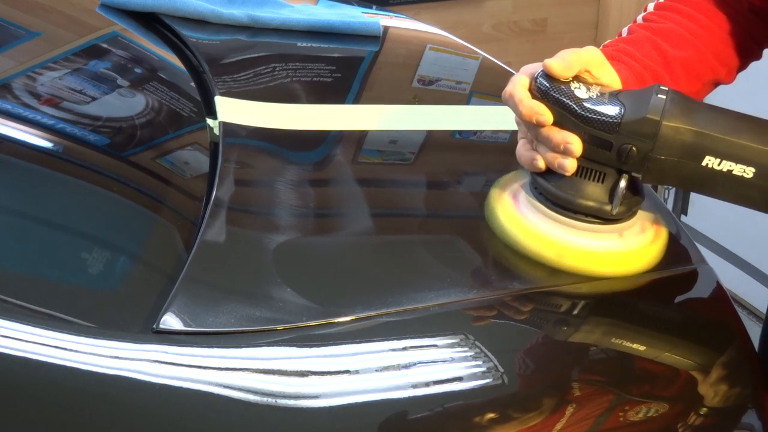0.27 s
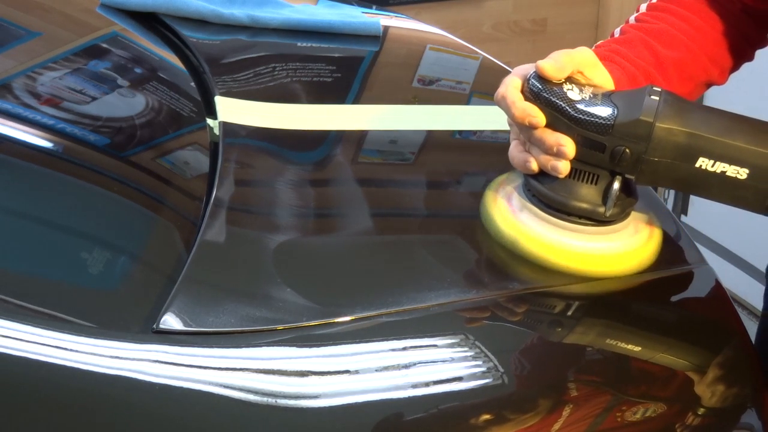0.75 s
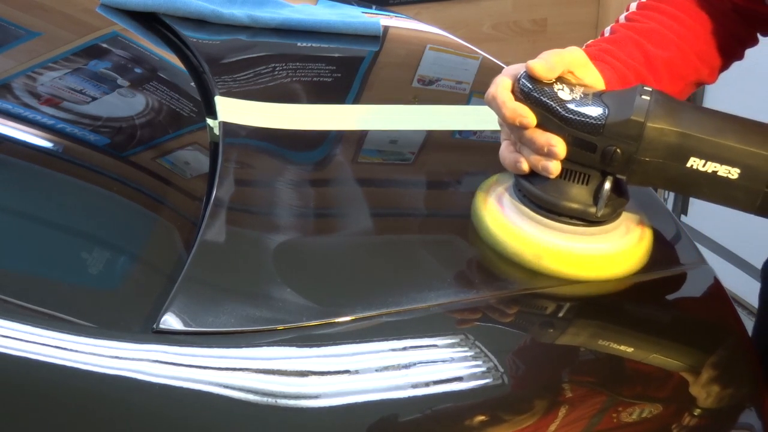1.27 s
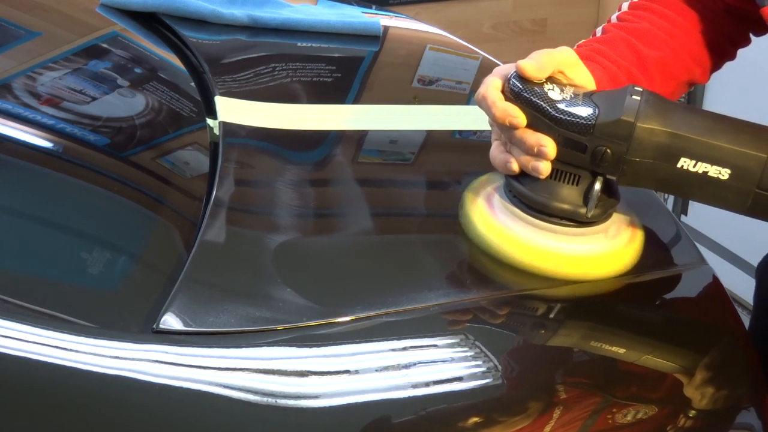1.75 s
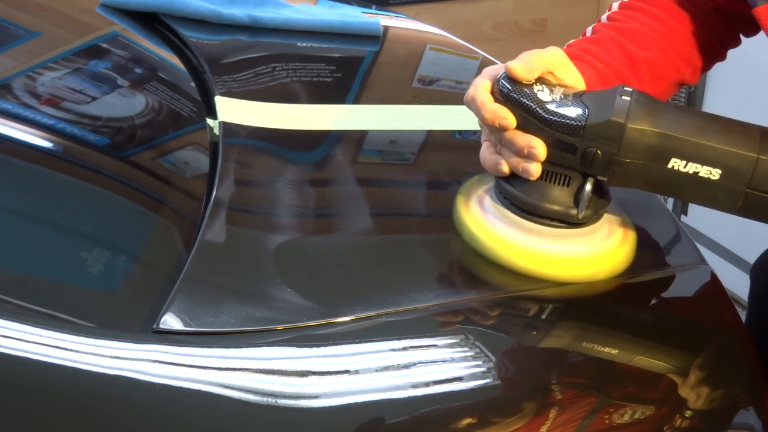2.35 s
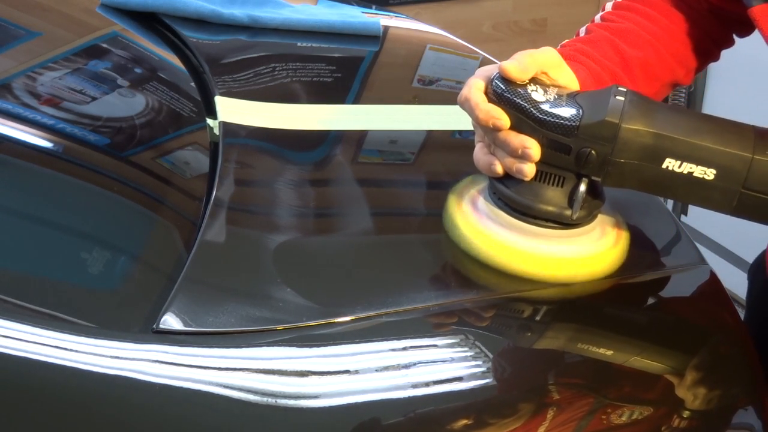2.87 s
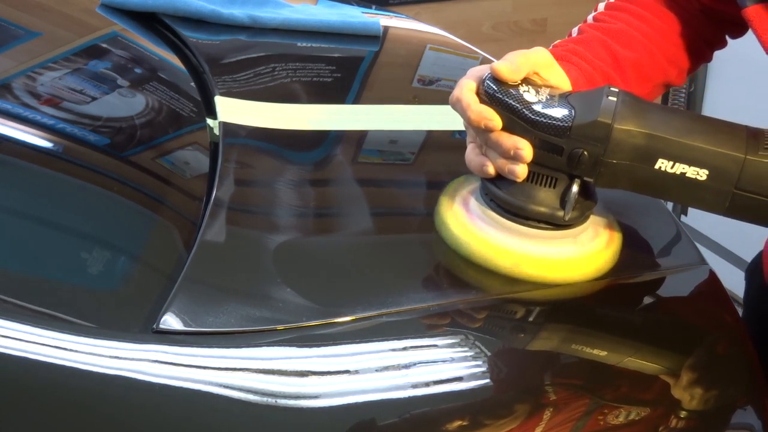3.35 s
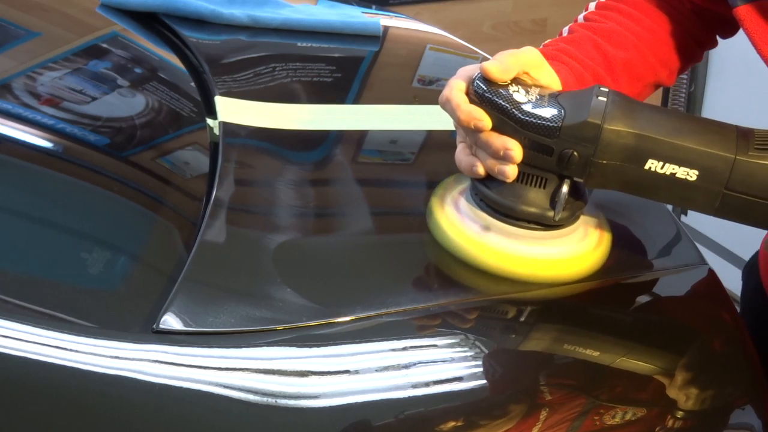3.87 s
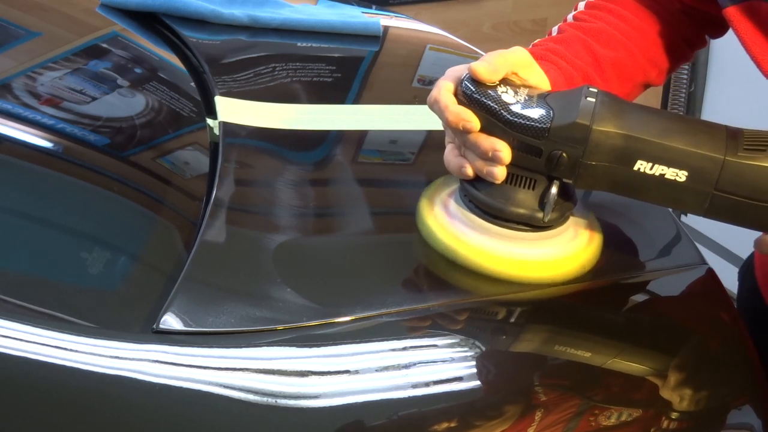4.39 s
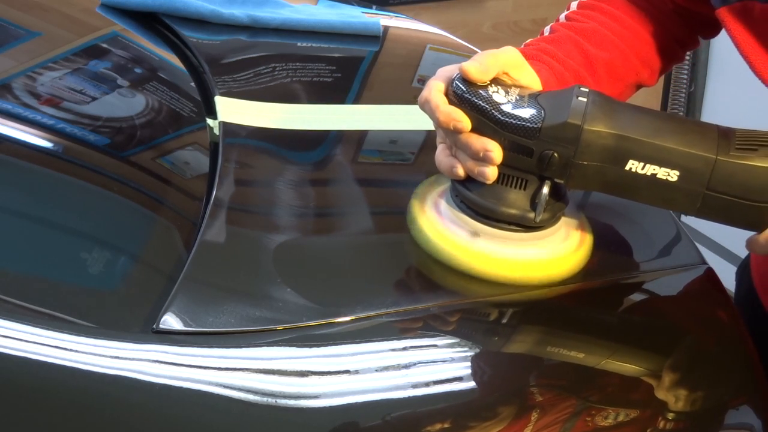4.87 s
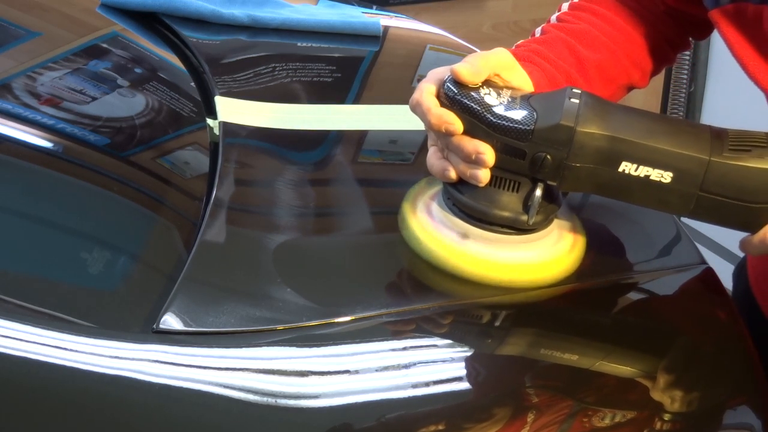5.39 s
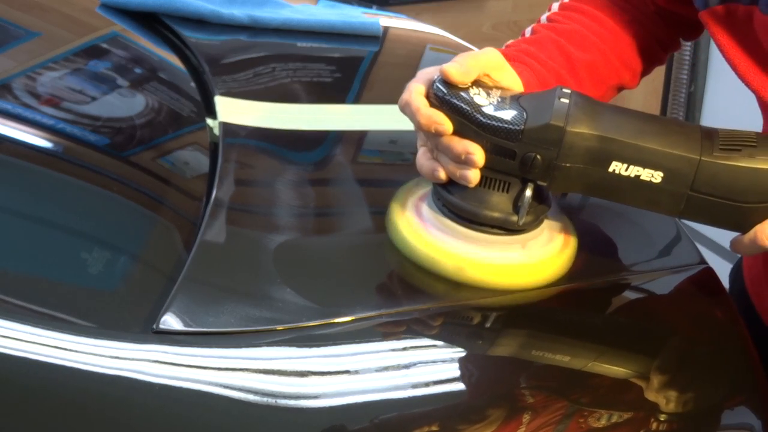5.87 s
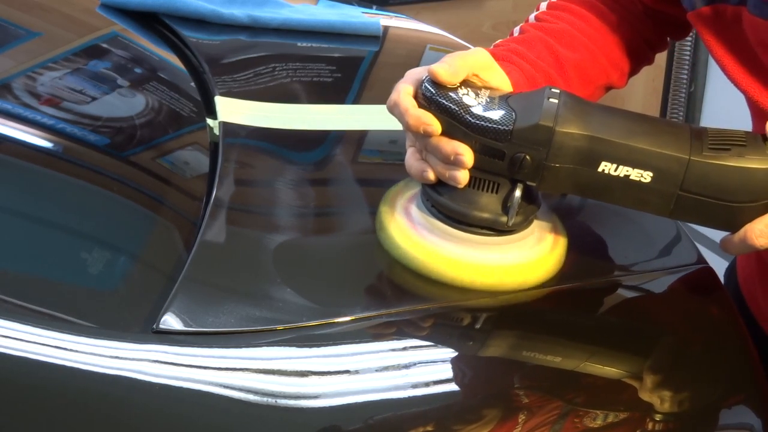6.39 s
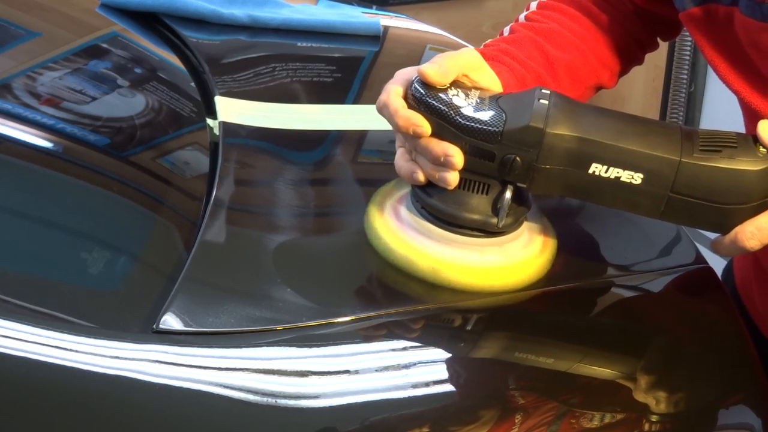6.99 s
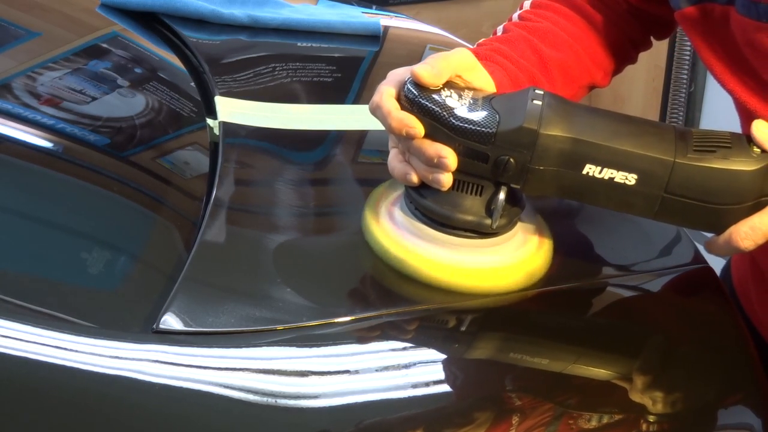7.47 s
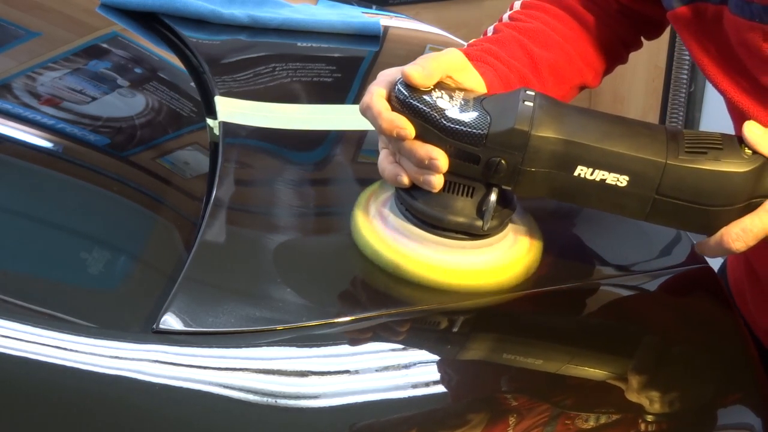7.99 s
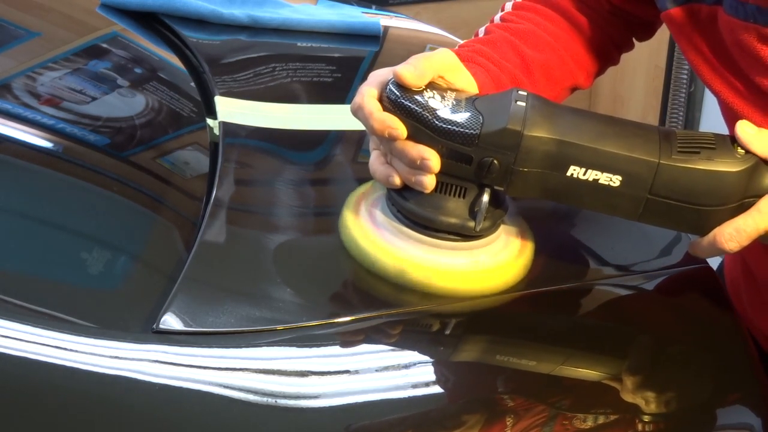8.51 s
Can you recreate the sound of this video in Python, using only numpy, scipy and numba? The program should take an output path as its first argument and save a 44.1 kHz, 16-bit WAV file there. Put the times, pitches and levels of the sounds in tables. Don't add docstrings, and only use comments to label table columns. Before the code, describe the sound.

A power polisher drones without pause, recorded near in stereo with little room sound. Dense metallic whine, fine gear rattle and breathy fan hiss cover a hollow hum from the car panel. Early on the hum swells in short shudders; later it weakens and wavers slowly as the foam pad drags, while rattle and rub grow, before the hum evens out again.

```python
import sys
import numpy as np
from scipy import signal
from scipy.io import wavfile
from scipy.ndimage import uniform_filter1d, minimum_filter1d
from numba import njit

SR = 44100
rng = np.random.default_rng(int(sys.argv[2]) if len(sys.argv) > 2 else 0)


def to_linear_factor(level_db):
    exponent = np.asarray(level_db, float) / 20
    return 10 ** exponent


def int16_out(signal):
    q = np.round(np.clip(np.atleast_2d(signal).T, -1, 1) * 32767)
    wavfile.write(sys.argv[1], SR, q.astype(np.int16))


N = 385434
STEP = 64
T = np.arange(0, N + 2 * STEP, STEP) / SR

PINION, CROWN = 9, 43
RATIO = PINION / CROWN

# time in seconds, speed in Hz.
SPEED = [(0.0, 368.18), (0.38, 367.72), (0.76, 367.8), (1.52, 368.32), (2.28, 367.95), (3.04, 367.95),
         (3.8, 367.78), (4.18, 367.86), (4.56, 367.7), (5.5, 367.79), (6.08, 367.41), (6.46, 367.26),
         (6.95, 367.36), (7.22, 367.8), (7.98, 369.85), (8.36, 370.19), (8.74, 371.11)]
# time in seconds, load 0-1.
LOAD = [
    (0.0, 0.03),
    (2.5, 0.04),
    (4.8, 0.2),
    (6.3, 0.48),
    (7.6, 1),
    (8.74, 0.81),
]
STRONG = [31 * PINION / CROWN, PINION, 47 * PINION / CROWN, 12, 23, 24, 26, 27]
SPINDLE = [3, 4, 5, 8, 19, 29, 33, 35, 36, 37, 40, 41, 44, 45, 46, 48, 49, 54, 55, 56, 57, 59, 60, 83, 85,
           88, 96, 102]
# frequency in Hz, level in dB per Hz.
RATTLE = [(2140, -3), (2300, -3), (2800, -1.5), (3150, -3.5), (3650, -1.5), (3900, -4.5), (4450, -0.5),
          (4800, -2.5), (5200, -7), (5700, -7), (6500, -4), (7200, -5.5), (7600, -8)]
# frequency in Hz, left minus right in dB.
LEAN = [(60, -0.5), (220, -1), (830, -2.5), (3100, -2.0), (11600, -1.5)]


def evened(x):
    return x / np.sqrt(np.mean(x ** 2) + 1e-20)


def read(points, hz):
    f, value = np.transpose(points)
    return np.interp(np.log(hz + 1), np.log(f + 1), value, value[0], value[-1])


def columns(rows):
    s, *values = np.transpose(rows)
    return [np.interp(T, s, v) for v in values]


def fine(control):
    return np.interp(np.arange(N), np.arange(len(T)) * STEP, control)


def drift(per_s):
    rates_hz = per_s * np.geomspace(.08, 1, num=8)
    return evened(sum(np.sin(2 * np.pi * (f * T + rng.random())) / np.sqrt(f) for f in rates_hz))


def swell(s, half_s, db):
    return db * np.exp(-((T - s) / half_s) ** 2)


def pad_turns():
    start_turns, per_s, slowing_per_s2 = .12, 4.967, .215
    return start_turns + per_s * T - slowing_per_s2 * T ** 2 / 2


def rotor_hz():
    drag_hz = .22
    return columns(SPEED)[0] + drag_hz * np.cos(2 * np.pi * pad_turns())


def rotor_turns():
    return np.cumsum(rotor_hz()) * STEP / SR


def beat_db(share, dip_turns):
    return 20 * np.log10(1 - np.clip(share, 0, .9) * np.cos(2 * np.pi * (pad_turns() - dip_turns)))


def grabs_db():
    # time in seconds, extra level in dB.
    grabs = [
        (4.55, 0.5),
        (5.47, 1),
        (5.94, 2),
        (8.42, .8),
    ]
    half_s = 0.11
    return sum(swell(s, half_s, db) for s, db in grabs)


def heard_db(order, db, db_per_s):
    fading = [12, 12, 12, 26, 9, STRONG[2], STRONG[0], 27, 27, 23, 24, 29, 2, 22, 18, 8, 29, STRONG[2], 1,
              22, 1 + PINION / CROWN, 2, 12, 3]
    # time in seconds, half width in seconds, level in dB (below 0 fades).
    fades = [(1.9, .5, -25), (6.4, 0.62, -10), (8.46, 0.49, -18), (3.1, 2.2, -30), (7.1, 0.33, -20),
             (8.4, .9, -20), (7.8, 0.87, -3.5), (5.3, 1.0, 4.5), (8.3, .4, -8), (5.8, 1.2, -11),
             (4.7, .7, -12), (5.7, .5, 7), (8.7, .6, 3), (1.0, 0.62, -9), (3.3, 1.6, 2.5), (6.0, 1.2, -12),
             (5.4, 0.83, -16), (7.5, .25, -8), (7.9, .07, -3), (5.0, 4.0, -2), (7.6, .5, 5.5),
             (6.64, 0.84, -3.5), (7.3, .4, 3), (7.8, .7, 0.5)]
    middle_s = 4.37
    passing_db = sum(swell(*row) for k, row in zip(fading, fades) if k == order)
    return db + db_per_s * (T - middle_s) + passing_db


@njit
def spin(angles, gains, sides, step):
    out = np.zeros((2, angles.shape[1] * step))
    for k in range(angles.shape[0]):
        for i in range(angles.shape[1] - 1):
            pointer = gains[k, i] * np.exp(1j * angles[k, i])
            turn = np.exp(1j * (angles[k, i + 1] - angles[k, i]) / step)
            turn = turn * (gains[k, i + 1] / gains[k, i]) ** (1 / step)
            left, right = pointer * sides[k], pointer / sides[k]
            for j in range(i * step, (i + 1) * step):
                out[0, j] += left.real
                out[1, j] += right.real
                left, right = left * turn, right * turn
    return out


def tones(turns, orders, levels_db, spread_rad):
    orders = np.array(orders, float)
    start, skew = rng.random((len(orders), 2)).T
    phase = spread_rad * (skew + .5) * rng.choice([-1, 1], len(orders))
    sides = to_linear_factor(read(LEAN, orders * SPEED[0][1]) / 2) * np.exp(1j * phase)
    angles = 2 * np.pi * (orders[:, None] * turns + start[:, None])
    return np.sqrt(2) * spin(angles, to_linear_factor(np.array(levels_db)), sides, STEP)[:, :N]


def drone(turns):
    # time in seconds, level in dB, share that beats with the pad turn 0-1.
    unbalance = [(0.0, -20.7, .04), (2.0, -19.3, .03), (4.1, -19.2, .06), (5.0, -21.3, .13),
                 (5.9, -24.3, .22), (6.5, -26.3, .42), (7.1, -28, .58), (7.65, -28.5, .55),
                 (7.8, -27.8, .15), (8.2, -26, .05)]
    # unloaded level in dB, rise with load in dB, beat share 0-1, place of dip in pad turns.
    orbit = [
        (-34, 4.5, 0.035, 0.05),
        (-41, 8, 0.16, -0.064),
    ]
    load = columns(LOAD)[0]
    db, share = columns(unbalance)
    levels = [heard_db(1, db, 0) + beat_db(share, -.14) + .6 * drift(30.0)]
    for low_db, more_db, part, dip_turns in orbit:
        levels.append(low_db + more_db * load + beat_db(part, dip_turns) + grabs_db() + .6 * drift(9.0))
    return tones(turns, [1, RATIO, 2 * RATIO], levels, 0.093)


def whine(turns):
    rotor = [2, 3, 4, 5, 6, 7, 8, 10, 11, 13, 14, 15, 16, 17, 18, 19, 20, 21, 22, 25, 28, 29]
    mixed = [(1, -1), (1, 1), (1, 2), (1, 3), (0, 105), (0, 110), (2, -3), (0, 7)]
    # level midway in dB, change in dB/s as the tool travels.
    rotor_db = [(-41.5, 1.1), (-47.0, 1.2), (-50.0, -0.5), (-54.0, 1.8), (-43.0, 0.5), (-43.0, 0.5),
                (-47.5, -0.1), (-53.5, 2.9), (-53.0, 2.0), (-47.0, 0.9), (-54.0, 1.5), (-52.5, 1.6),
                (-45.5, 0.3), (-46.5, 0.5), (-39.0, -0.8), (-44.0, -0.7), (-50.5, 0.7), (-48.5, 1.1),
                (-38.5, 0.0), (-39.5, 0.5), (-49.0, 1.8), (-48.0, 0.7)]
    spindle_db = [(-60.0, 3.0), (-47.5, 1.5), (-45.5, -0.6), (-49.0, -1.6), (-47.0, -0.4), (-44.5, -0.6),
                  (-49.0, -0.3), (-41.5, 0.9), (-46.5, 0.8), (-44.0, 1.0), (-43.0, 0.3), (-48.5, 0.9),
                  (-41.5, -0.8), (-48.5, -1.7), (-47.5, 1.7), (-48.0, 0.7), (-48.0, 1.2), (-46.0, 2.0),
                  (-47.0, -0.6), (-43.0, 0.9), (-42.0, 0.2), (-43.5, 1.3), (-45.0, -0.6), (-44.5, -0.5),
                  (-46.0, 0.3), (-48.5, 0.6), (-47.0, 0.9), (-46.0, -0.8)]
    mixed_db = [(-50, 0.3), (-55, 3.0), (-49, -0.4), (-45, -0.7), (-40.5, -1.5), (-50, 3), (-51.5, -0.5),
                (-51.5, -.5)]
    strong_db = [(-34, -.4), (-36.5, 0), (-35, .6), (-33.5, .2), (-33, .2), (-32.5, .2), (-33.5, .1),
                 (-35, .2)]
    orders = [*rotor, *(RATIO * k for k in SPINDLE), *(j + RATIO * k for j, k in mixed)]
    rough_db = 3.6 - 2.0 * columns(LOAD)[0]
    levels = []
    for k, row in zip(orders, [*rotor_db, *spindle_db, *mixed_db]):
        db = heard_db(k, *row) + drift(5.0)
        levels.append(db + (k < 5) * rough_db * drift(90.0))
    levels += [heard_db(k, *row) + 1.5 * drift(20.0) for k, row in zip(STRONG, strong_db)]
    edge_db, knee_hz, curve_db, lead_s = -28.5, 367.12, 55, .03
    over_hz = np.clip(np.interp(T + lead_s, T, rotor_hz()) - knee_hz, 0, .7)
    flicker_db = np.clip(9 * drift(150.0) + 6, -20, 2)
    levels.append(edge_db - curve_db * over_hz ** 2 + flicker_db)
    return tones(turns, orders + STRONG + [30], levels, 0.2)


def comb(turns):
    level_db, scatter_db = -48.5, 0.5
    orders = [RATIO * k for k in range(28, 99) if k not in SPINDLE + [31, 43, 47, 86]]
    orders += [j + RATIO * k for j in range(6, 20) for k in (-2, -1, 1, 2) if j % PINION]
    levels = []
    for k in orders:
        chance_db = scatter_db * (rng.standard_normal() + drift(3.3))
        levels.append(level_db + read(RATTLE, k * SPEED[0][1]) + chance_db)
    return tones(turns, orders, levels, 0.38)


def noise(spectrum, patchy_db):
    # frequency in Hz, left-right likeness 0-1.
    likeness = [(30, 0.9), (100, 0.91), (300, 0.77), (700, 0.9), (1500, 0.86), (5000, 0.86), (11000, 0.92)]
    frames, bins_hz = N // 512 + 5, np.fft.rfftfreq(2048, 1 / SR)
    inside = (bins_hz >= spectrum[0][0]) & (bins_hz < spectrum[-1][0])
    hz = bins_hz[inside]
    a, b, c, d, patches = rng.standard_normal((frames, len(hz), 5)).T
    patches = uniform_filter1d(patches, size=10, axis=0)
    patches = evened(uniform_filter1d(patches, size=12, axis=1))
    same = np.clip(read(likeness, hz), -1, 1)[:, None]
    left = a + 1j * b
    right = same * left + np.sqrt(1 - same ** 2) * (c + 1j * d)
    pair = np.array([left, right]) * to_linear_factor(read(spectrum, hz)[:, None] + patchy_db * patches)
    lean_db = np.array([[.5], [-.5]]) * read(LEAN, hz)
    z = np.zeros((2, len(bins_hz), frames), np.complex64)
    z[:, inside] = pair * to_linear_factor(lean_db)[:, :, None]
    return evened(signal.istft(z, nperseg=2048, noverlap=1536)[1][:, :N])


def pumped(turns, depths):
    mains_hz = 50
    spindle = turns * RATIO
    cycles = [spindle, 2 * spindle, 3 * spindle, 4 * spindle, turns, 2 * mains_hz * T]
    return 1 + sum(d * np.cos(2 * np.pi * (fine(c) + rng.random())) for d, c in zip(depths, cycles))


def roar(turns):
    # unloaded level in dB, rise with load in dB.
    noise_db = [
        (-32, 3),
        (-25, 3.5),
        (-23.5, 1.5),
    ]
    # frequency in Hz, level in dB per Hz.
    rub_spectrum = [(15, -16), (35, -14), (58, -1.5), (100, -9.5), (125, -8), (190, -11), (250, -8),
                    (300, -21), (365, 2.5), (430, -4.5), (480, -7), (700, -4), (1200, -8), (2140, -12)]
    hiss_spectrum = [(7600, -7), (7900, -8), (8200, -1), (8600, 0.5), (9000, -2.5), (9500, -3),
                     (10000, -5.5), (10500, -10.5), (11100, -7.5)]
    panel_spectrum = [(255, -9), (285, 1.5), (305, 10.5), (340, -0.5)]
    rattle_pump = [0.079, 0.021, 0.12, 0.045, 0.027, 0.019]
    hiss_pump = [0.14, 0.033, 0.33, 0.082, 0.053, 0.1]
    # time in seconds, half width in seconds, extra level in dB.
    shudders = [
        (.15, 0.11, 7),
        (1.45, 0.36, 10),
        (3.3, .3, 7),
        (3.9, .3, 8),
        (4.7, 0.22, 4),
        (6.2, .3, 3),
        (7.6, 0.5, 2),
    ]
    load = columns(LOAD)[0]
    rub_db, rattle_db, hiss_db = (low_db + more_db * load + grabs_db() for low_db, more_db in noise_db)
    boom_db = -43.5 + 1.8 * drift(6.0) + sum(swell(*row) for row in shudders)
    grip = drift(30.0)
    rub = to_linear_factor(fine(rub_db + 1.04 + 0.88 * grip)) * noise(rub_spectrum, 1.05)
    panel = to_linear_factor(fine(boom_db)) * noise(panel_spectrum, 1.8)
    rattle = to_linear_factor(fine(rattle_db - 2.0 + 0.74 * grip)) * pumped(turns, rattle_pump) * noise(RATTLE, 1.8)
    hiss = to_linear_factor(fine(hiss_db - 1.5 + 0.26 * grip)) * pumped(turns, hiss_pump) * noise(hiss_spectrum, 0.31)
    return rub + panel + rattle + hiss


def scene():
    turns = rotor_turns()
    return drone(turns) + whine(turns) + comb(turns) + roar(turns)


def masked(x):
    gear_db, fan_db, cut_db = 14.5, 17.0, -25.0
    hz, _, z = signal.stft(x, SR, nperseg=2048, noverlap=1024)
    power = (abs(z) ** 2).mean(0)
    high = hz[:, None] > 6000
    wide_peak = -minimum_filter1d(-power, size=41, axis=0)
    narrow_peak = -minimum_filter1d(-power, size=19, axis=0)
    near = np.where(high, wide_peak, narrow_peak)
    floor = near / to_linear_factor(2 * np.where(high, fan_db, gear_db))
    under = uniform_filter1d(power, size=5, axis=0) < floor
    hidden = under & (hz[:, None] > 2000)
    return signal.istft(z * np.where(hidden, to_linear_factor(cut_db), 1), SR, nperseg=2048, noverlap=1024)[1][:, :N]


def top_cut(x):
    return signal.sosfilt(signal.butter(12, 11075, fs=SR, output="sos"), x)


def record(dry):
    edge_hz = 11032
    low_pass = signal.firwin(8191, edge_hz, window=("kaiser", 6), fs=SR)
    narrow = signal.oaconvolve(dry, low_pass[None], "same")
    return top_cut(masked(narrow))


dry = scene()
out = record(dry)
int16_out(out)
```